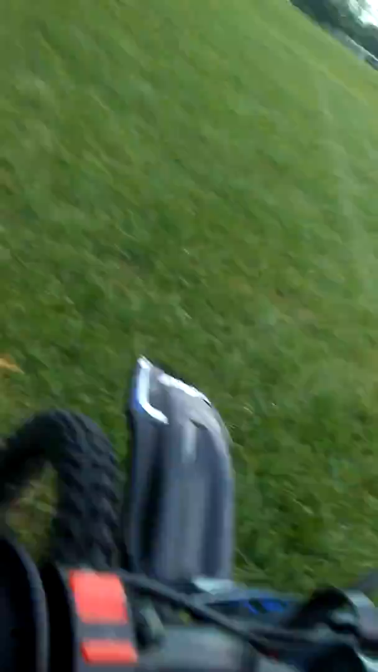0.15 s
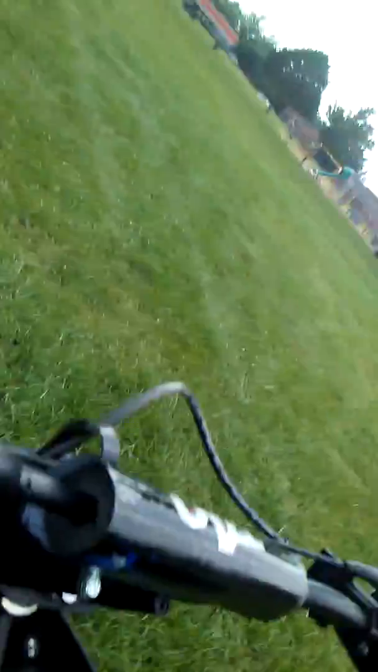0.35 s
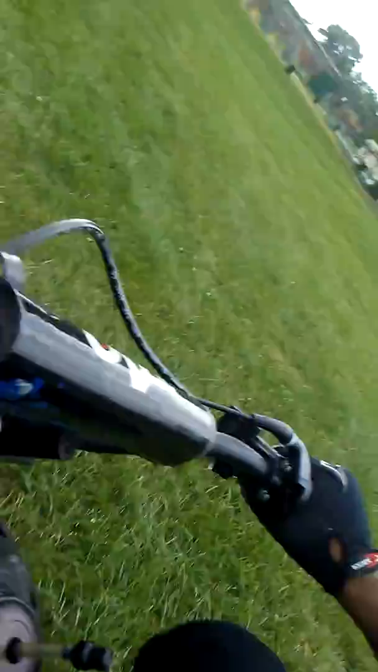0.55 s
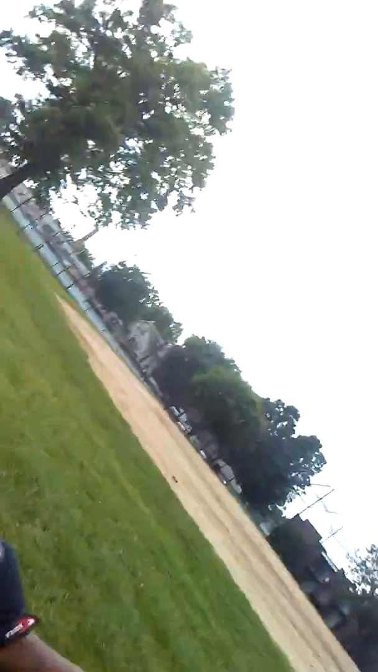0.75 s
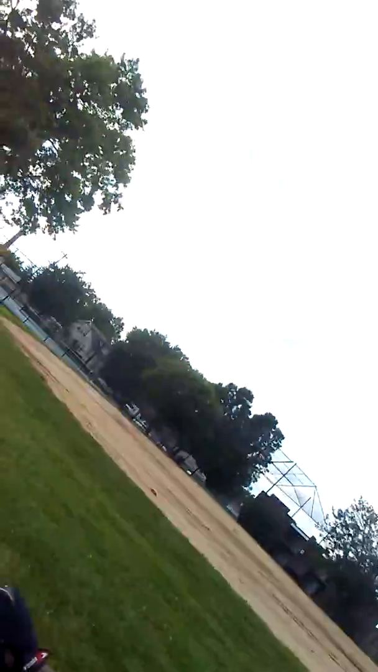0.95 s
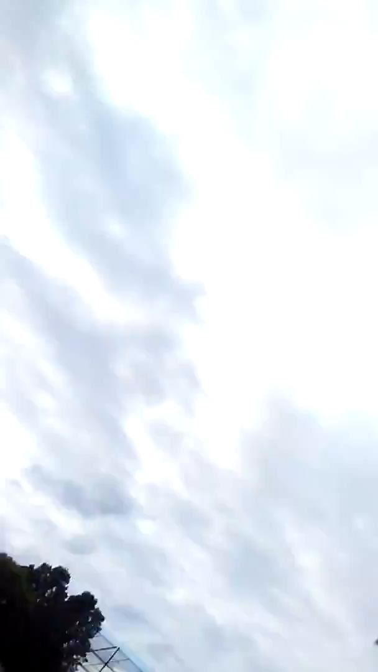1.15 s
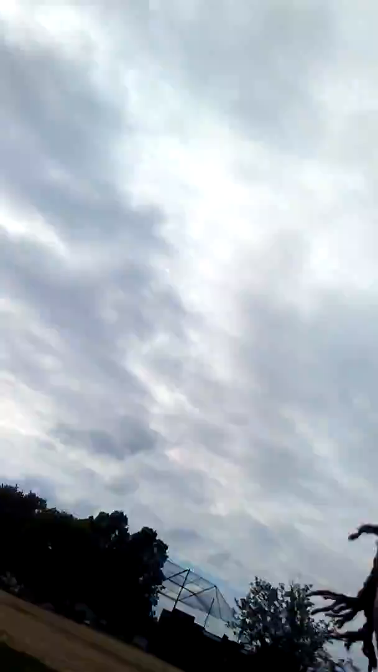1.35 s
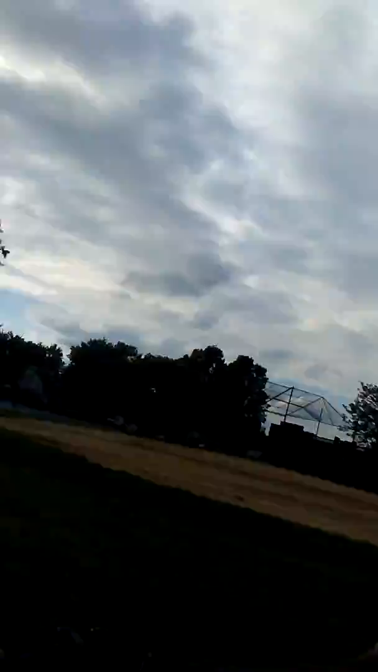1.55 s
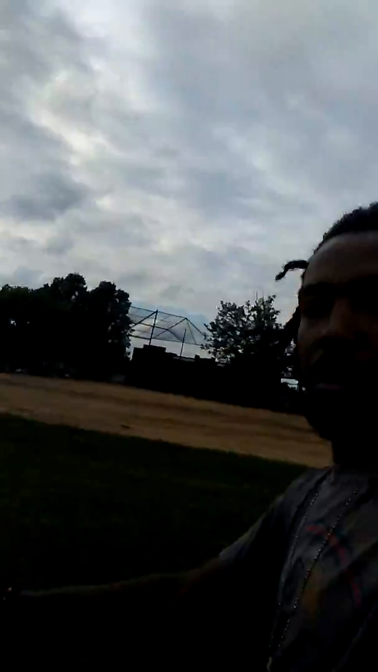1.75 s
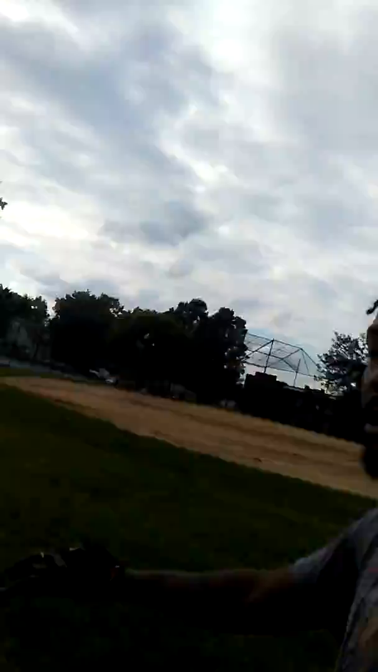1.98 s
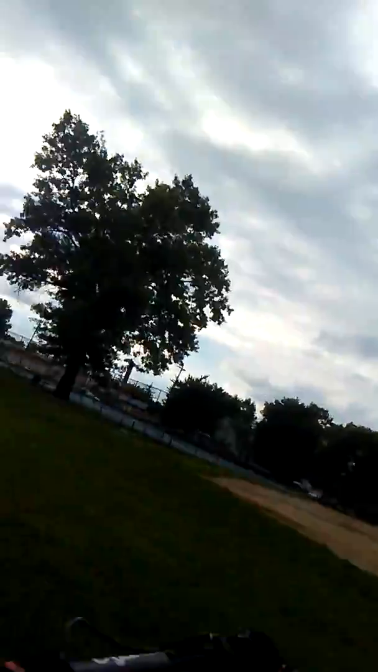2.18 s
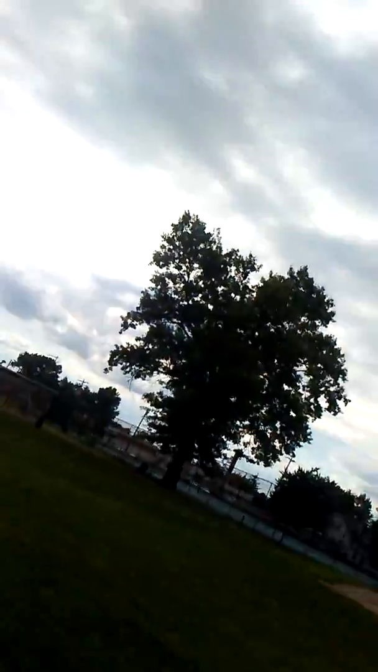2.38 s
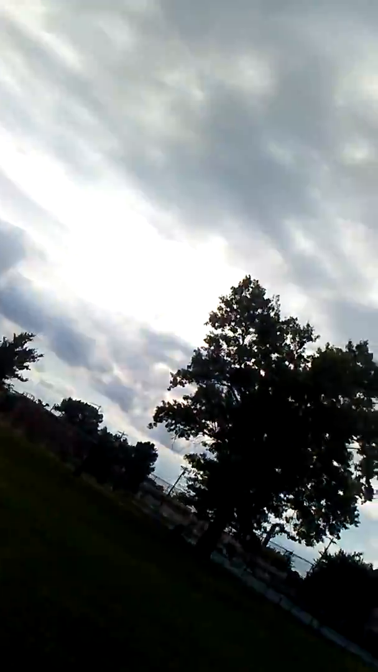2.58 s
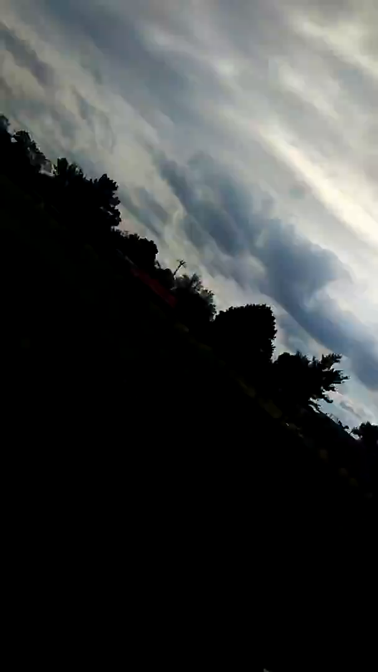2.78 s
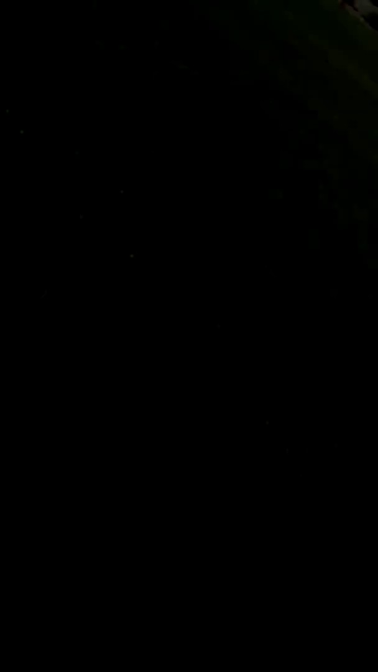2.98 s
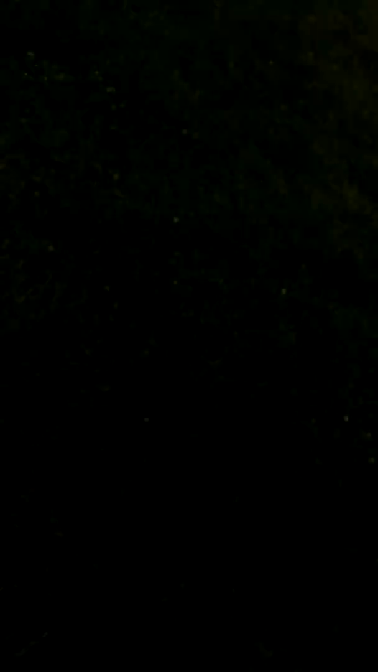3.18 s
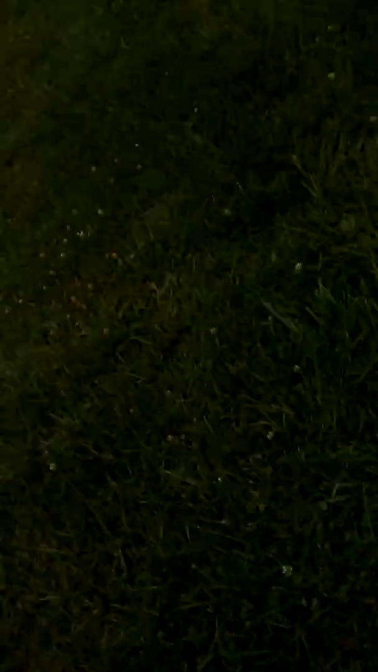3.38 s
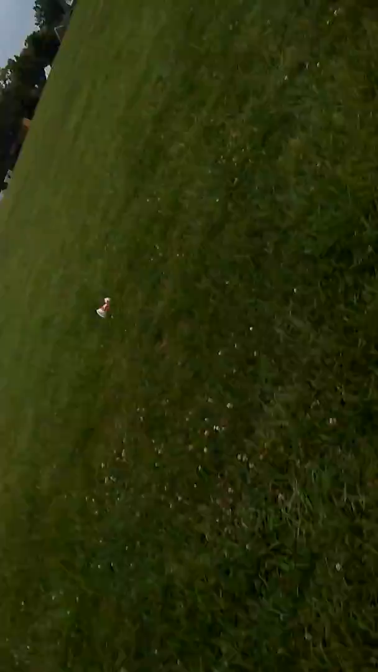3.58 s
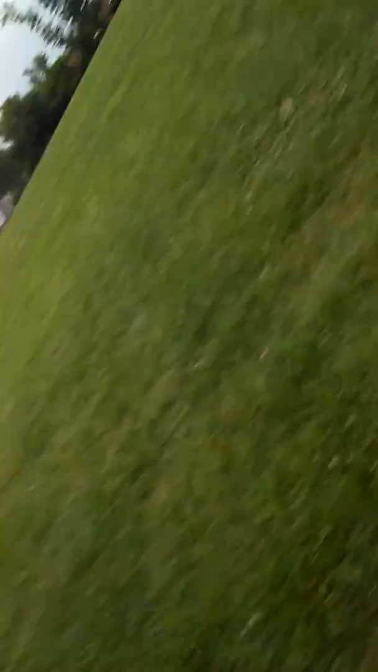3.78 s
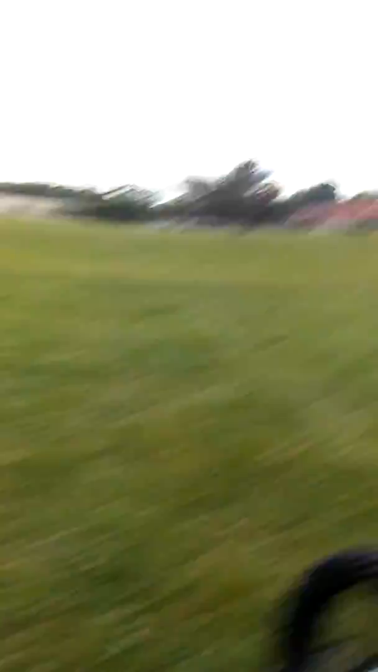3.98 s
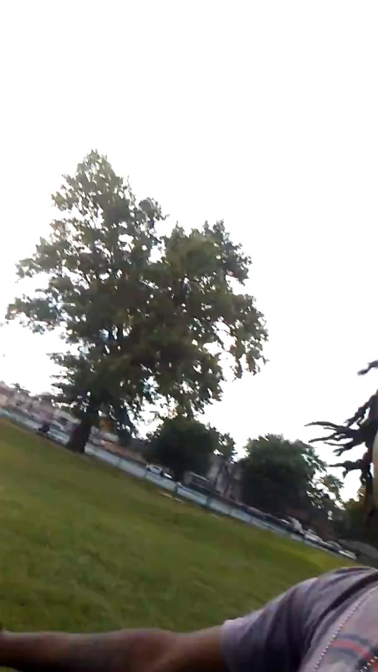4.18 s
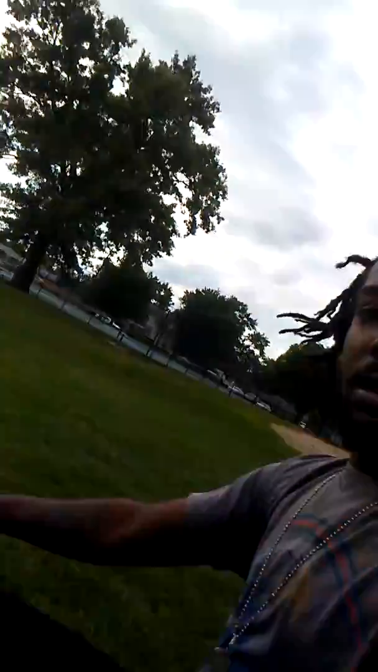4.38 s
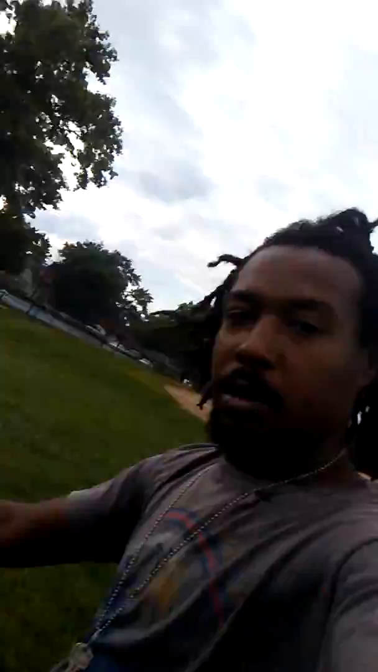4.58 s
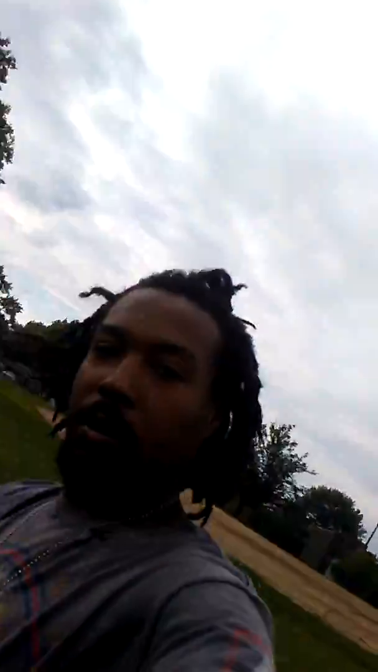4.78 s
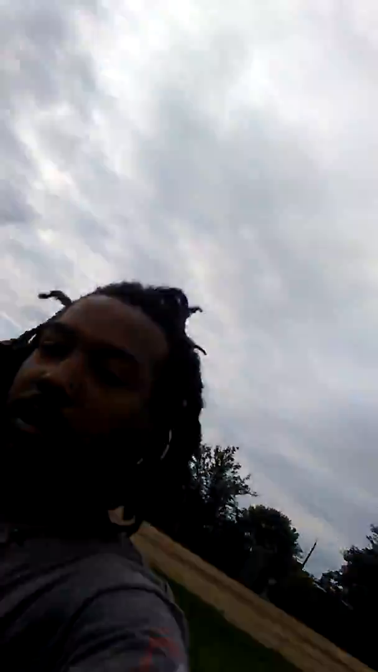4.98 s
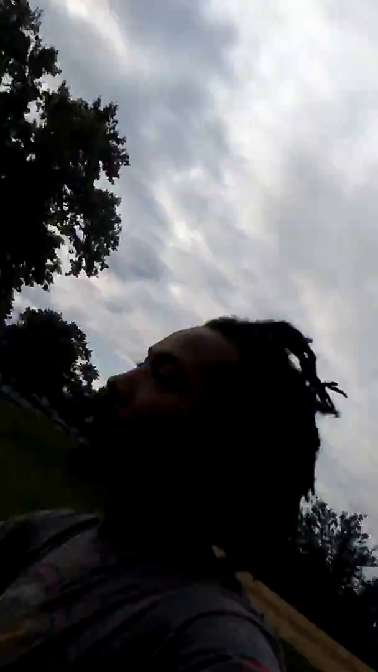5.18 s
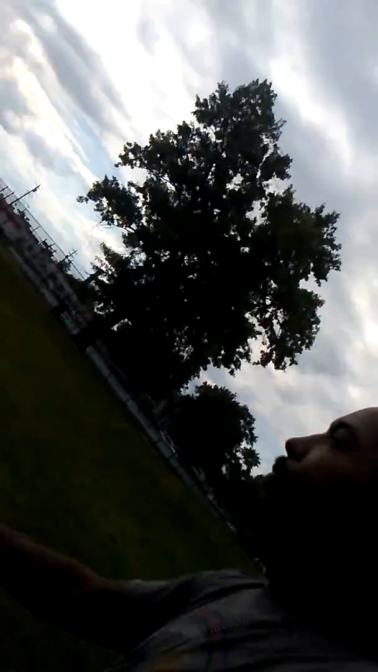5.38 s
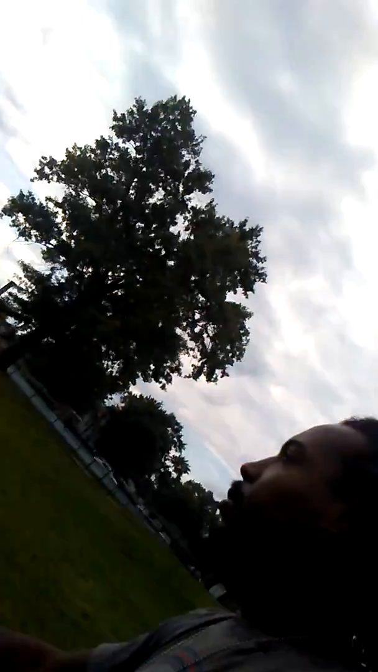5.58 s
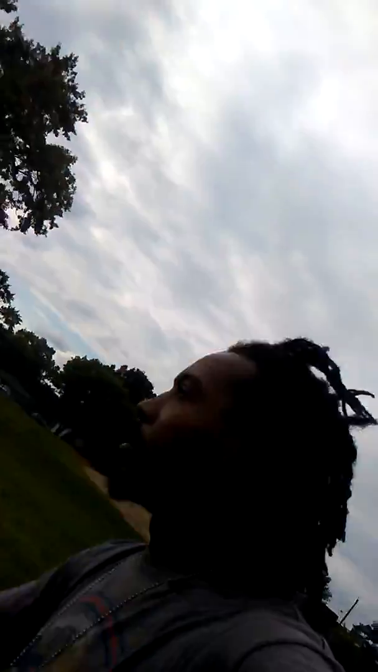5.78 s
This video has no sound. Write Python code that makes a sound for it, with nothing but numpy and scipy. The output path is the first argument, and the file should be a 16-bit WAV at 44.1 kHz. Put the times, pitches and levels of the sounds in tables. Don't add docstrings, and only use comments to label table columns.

```python
import sys
import numpy as np
from scipy import signal
from scipy.fft import rfft, irfft, next_fast_len
from scipy.io import wavfile
from scipy.ndimage import uniform_filter1d

SR = 44100
rng = np.random.default_rng(int(sys.argv[2]) if len(sys.argv) > 2 else 0)


def makeup_ratio(level_db):
    decades = np.asarray(level_db, float) / 20
    return 10 ** decades


def put_to_file(sound):
    columns = np.atleast_2d(sound).T
    safe = np.clip(columns, -1, 1)
    whole_steps = np.round(safe * 32767)
    wavfile.write(sys.argv[1], SR, whole_steps.astype(np.int16))


N = 257588
START_S = .5278

# time in seconds, firings per second.
SPEED = [(0.52, 19.8), (0.97, 18.98), (1.09, 19.39), (1.68, 19.55), (1.98, 18.59), (2.54, 19.42),
         (2.6, 19.22), (3.11, 20.82), (3.34, 21.0), (3.62, 23.88), (4.1, 26.2), (4.28, 24.52),
         (4.61, 26.66), (4.84, 27.9), (5.19, 27.88), (5.29, 26.48), (5.64, 25.23), (5.84, 27.24)]
# time in seconds, view of the intake 0-1, view of the cooling fins 0-1,
# hand cupped over the microphone 0-1.
SWING = [(.55, 0.1, 0.1, 0), (.9, .2, 0.38, .2), (1.2, 0.45, 0.84, 0.38), (1.4, 0.87, 0.66, 0.08),
         (1.75, .2, .8, 0.1), (2.2, 0.5, 0.62, 0.63), (2.53, 0.3, 0.73, 0.93), (2.86, 0.62, 0.76, 0.42),
         (3.05, 0.73, 0.76, 0.95), (3.36, 0.91, 0.76, 0.48), (3.62, 0.88, 0.87, 0.01), (3.92, 0.65, 0.9, 0),
         (4.18, 0.88, 0.96, 1), (4.35, 0.74, 0.85, 0.28), (4.68, 0.97, 1, 0.27), (5.0, 0.9, 0.85, 0.52),
         (5.34, 0.71, 0.64, 0.24), (5.84, 0.57, 0.73, 0.43)]


def exhaust(turns):
    # frequency in Hz, level in dB, decay by 60 dB in seconds, rise in seconds.
    boom_long = [(115.98, 9.5, 0.26, 0.00051), (219, -31.5, 0.54, 0.028), (93, -6.5, 0.2, 0.0023)]
    boom_short = [(111.6, 11.5, 0.11, 0.015), (240, 8, 0.032, 0.0009), (83, -7, 0.073, 0.012)]
    boom_loaded = [(120.3, 3, 0.18, 0.0049), (148, -9, 0.02, 0.011), (243.5, 0.5, 0.041, 0.0072),
                   (47.7, -7.5, 0.064, 0.0042), (202, 4, 0.037, 0.0028)]
    bark_idle = [(343.9, 1, 0.057, 0.0082), (295, -6, 0.044, 0.0036), (419, -8, 0.057, 0.007),
                 (224, -7, 0.021, .001)]
    bark_loaded = [(370.5, 2, 0.067, 0.008), (299, 0.5, 0.031, 0.0005), (432.5, -5.5, 0.14, 0.011),
                   (205, 6.5, 0.015, 0.00032), (454, -3.5, 0.042, 0.0026)]
    rasp_idle = [(557, 2.5, 0.037, 0.0039), (649, 5, 0.048, 0.0047), (710, 2, 0.045, 0.0046),
                 (823, 4, 0.025, 0.0042), (864, -6, 0.029, 0.0069)]
    rasp_loaded = [(726.6, 2, 0.12, 0.0013), (848, 16.5, 0.018, 0.0009), (590, -47, 0.065, 0.0078),
                   (1060, -21, 0.038, 0.0024)]
    load, hidden, near_db, aim = throttle()

    boom_db = -8 + near_db - 14.5 * hidden
    bark_db = -10 + .2 * near_db - 9.5 * aim
    rasp_db = -34.5 + 14.5 * aim

    advance = .02 * load + .004 * np.maximum(curves(SPEED)[0] - 21, 0)
    fired = np.floor(turns + advance + .005 * drift(1500))
    blows = (np.diff(fired, prepend=fired[0]) > 0) * makeup_ratio(.21 * rng.standard_normal(N))
    blows = signal.lfilter(np.hanning(45), 1, blows)

    lag = 48
    long_boom = ring(np.roll(blows, 2 * lag), boom_long)
    short_boom = ring(np.roll(blows, lag), boom_short)
    boom = blend(load, blend(hidden, long_boom, short_boom), ring(blows, boom_loaded))
    bark = blend(load, ring(blows, bark_idle, against=2), ring(blows, bark_loaded, against=2))
    turned = np.minimum(1.48 * load, 1)
    rasp = blend(turned, ring(blows, rasp_idle, against=3), ring(blows, rasp_loaded, against=0))
    rasp = rasp * (1 + .45 * (1 - aim) * drift(120))
    return makeup_ratio(boom_db + 6.5) * boom - makeup_ratio(bark_db + 5) * bark - makeup_ratio(rasp_db + 3.5) * rasp


def crank():
    running = np.arange(N) >= START_S * SR - 3 * SR // 10
    turns = np.cumsum(curves(SPEED)[0] * running) / SR
    first_turn = .197
    return turns - turns[round(START_S * SR)] + first_turn - 1


def throttle():
    # time in seconds, load 0-1, pipe mouth hidden by the rider 0-1, nearness of the pipe in dB,
    # microphone aimed at the pipe 0-1.
    riding = [(.5, 0.14, 0.17, -4, 0.65), (.9, 0.25, 0.26, -1, 0.77), (1.4, 0.17, 0.24, -1.5, 0.64),
              (1.87, 0.15, 0.97, 3.5, 0.67), (2.3, 0.17, 0.76, 1, 0.63), (2.8, 0.32, 0.47, 2, 0.59),
              (3.19, .29, 0.23, 4.5, 0.44), (3.52, .4, 0.17, -0.5, 0.84), (3.85, .48, 0.15, 2, 0.82),
              (4.2, 0.47, 0.18, 1, 0.36), (4.8, 0.69, 0.13, -2.5, 0.24), (5.2, 0.79, 0.24, -2, 0.16),
              (5.5, 0.59, 0.54, 2.5, 0.36), (5.84, 0.79, 0.3, -3, 0.47)]
    load, hidden, near_db, aim = curves(riding)
    return np.clip(load, 0, 1), np.clip(hidden, 0, 1), near_db, aim


def intake_hiss(turns):
    # frequency in Hz, bandwidth in Hz, level in dB.
    intake_modes = [(5440, 1630, 2.5), (6940, 3000, -7.5)]
    upper_modes = [(8780, 2670, 17), (10900, 1800, 7)]
    intake, fins, cup = curves(SWING)
    hidden = throttle()[1]
    intake_db, upper_db = -51 + 35 * intake, -61 + 38.5 * fins
    intake_shift_hz = 694 - 800 * intake + 101.7 * cup
    upper_shift_hz = 300 - 1700 * cup
    lower = makeup_ratio(intake_db - 4.6) * shifted(resonant_noise(intake_modes), intake_shift_hz)
    upper = makeup_ratio(upper_db - .87) * shifted(resonant_noise(upper_modes), upper_shift_hz)
    hiss = signal.lfilter(*signal.butter(4, 4700, "high", fs=SR), lower + upper)

    depth = np.minimum(.22 * (curves(SPEED)[0] - 18), .75) * (1 - 1.93 * hidden)
    depth = np.clip(depth, 0, 1)
    phase = turns % 1
    valve = .29 * np.exp(-((phase - .65) / .34) ** 6) + 1.95 * np.exp(-((phase - .48) / .15) ** 4)
    return (1 - depth + depth * valve) * hiss


def valve_clatter():
    # frequency in Hz, bandwidth in Hz, level in dB.
    case_modes = [(1503, 68, 2), (1767, 130, 0.5), (2900, 740, 7.5)]
    # time in seconds, level in dB, half length in seconds.
    clatter = [(.55, -32, 0.073), (.88, -45, 0.085), (1.43, -27.5, 0.37), (1.95, -32, 0.26),
               (2.45, -29, 0.35), (2.98, -29.5, 0.25), (3.36, -33, 0.062), (3.75, -33, 0.084),
               (4.25, -34, 0.053), (4.51, -40, .1), (5.01, -30, 0.14), (5.4, -28, 0.15), (5.67, -41, 0.08)]
    return makeup_ratio(-3.5) * spells(clatter) * resonant_noise(case_modes)


def engine_wash():
    # frequency in Hz, level in dB.
    wash_spectrum = [(40, -22.5), (150, 5.5), (600, -7), (1000, -11), (1500, -9.5), (2200, -13),
                     (3800, -18.5), (6500, -18.5), (10200, -35.5), (12000, -23), (13500, -33.5),
                     (15500, -35)]
    load, hidden, _, _ = throttle()
    wash_db = -29 + 2 * curves(SWING)[0] - 8.5 * hidden + 8 * load
    return makeup_ratio(wash_db + 3 + 2 * drift(400)) * coloured(gritty(900, 3, .3), wash_spectrum)


def knocks():
    # start in seconds, peak in dB, ring in Hz, ring length in seconds.
    hits = [(0.536, -4, 3900, 0.0012), (0.5526, -0.5, 3740, 0.0036), (0.582, -9.5, 3940, 0.0017),
            (1.327, -5.5, 6600, 0.0009), (1.353, 14.5, 4140, 0.001), (2.49, -18, 4160, .002),
            (3.06, 4.5, 4120, 0.0045), (3.287, -22, 5230, 0.0024), (3.65, -24, 2980, 0.0027),
            (5.461, -6, 2810, 0.0039), (5.526, -12, 2860, 0.0025), (5.543, -4, 2480, 0.0057),
            (5.587, -4, 3580, 0.0081), (5.809, -2, 2900, 0.0011)]
    # time in seconds, level in dB, length in seconds.
    scrapes = [
        (0.924, -26.5, 0.04),
        (1.036, -28.5, 0.019),
        (1.337, -23.5, 0.0092),
        (1.548, -27.5, 0.044),
        (3.086, -27, 0.1),
        (5.708, -22, 0.0046),
        (5.777, -20.5, 0.013),
        (5.818, -25, 0.022),
    ]
    out, t = np.zeros(N), np.arange(3000) / SR
    grains = rng.standard_normal((len(hits) + len(scrapes), len(t)))
    grains = signal.lfilter(*signal.butter(2, [1400, 6500], "band", fs=SR), grains)
    for (s, db, hz, length), grain in zip(hits, grains):
        partials = ((.6, 1), (1.2, .7), (1.9, .3))
        tick = sum(share * np.sin(2 * np.pi * ratio * hz * t) for ratio, share in partials)
        tick = .45 * tick + 2.2 * grain + .25 * np.diff(grain, 2, prepend=[0, 0])
        onset = np.sin(np.minimum(t / .0003, np.pi / 2)) ** 2
        tick = tick * np.exp(-t / .0006) * onset
        tail = .2 * np.sin(2 * np.pi * hz * t) * np.exp(-t / length)
        add(out, s, makeup_ratio(db) * (tick + tail))
    middle = 1500 / SR
    for (s, db, length), grain in zip(scrapes, grains[len(hits):]):
        swell = np.exp(-((t - middle) / (length / 2)) ** 2)
        add(out, s - middle, makeup_ratio(db) * 2 * grain * swell)
    return out


def wind():
    # frequency in Hz, level in dB.
    thump_spectrum = [(20, -28), (55, -1.5), (100, -3), (200, -13.5), (600, -54), (3000, -75), (12000, -86)]
    flutter_spectrum = [(60, -87), (150, -5), (300, -9.5), (450, -3), (700, -22), (1200, -27), (3000, -66),
                        (12000, -85)]
    # time in seconds, thump in dB, half length in seconds, flutter in dB.
    gusts = [(1.1, -25, 0.26, -38), (2.1, -29, 0.75, -64), (4.3, -23, 0.051, -18), (4.5, -14, 0.044, -30),
             (4.75, -29, 0.13, -35), (5.13, -18, 0.061, -28), (5.39, -10.5, 0.053, -9),
             (5.47, -22, 0.02, -8.5), (5.54, -5, 0.051, -18), (5.66, -16, 0.029, -5.5),
             (5.84, -9, 0.099, -10.5)]
    thumps = makeup_ratio(-33) + spells(gusts)
    flutters = makeup_ratio(-36) + spells(gusts, column=3)
    thump = thumps * makeup_ratio(2.4 * drift(900)) * coloured(rng.standard_normal(N), thump_spectrum)
    flutter = flutters * makeup_ratio(3 * drift(400)) * coloured(rng.standard_normal(N), flutter_spectrum)
    return thump + flutter


def ring(blows, modes, against=None):
    t, response = np.arange(SR // 2) / SR, 0
    for k, (hz, db, t60, rise) in enumerate(modes):
        swing = -makeup_ratio(db) if k == against else makeup_ratio(db)
        envelope = makeup_ratio(-60 * t / t60) * (1 - np.exp(-t / max(rise, 1e-4)))
        response = response + swing * envelope * np.sin(2 * np.pi * hz * t)
    return evened(signal.oaconvolve(blows, response)[:N])


def resonate(x, hz, width):
    r = np.exp(-np.pi * width / SR)
    return signal.lfilter([1 - r], [1, -r * np.exp(2j * np.pi * hz / SR)], x).real


def resonant_noise(modes):
    total = 0
    for hz, width, db in modes:
        once = resonate(gritty(1500, 3, .5), hz, width)
        total = total + makeup_ratio(db + 2.5 * drift(200)) * evened(resonate(once, hz, width))
    return evened(total)


def gritty(per_s, spread_db, share):
    sizes = rng.standard_normal(N) * makeup_ratio(spread_db * np.minimum(rng.exponential(1, N), 4))
    clicks = sizes * (rng.random(N) < per_s / SR)
    return rng.standard_normal(N) + share * evened(clicks)


def coloured(x, spectrum):
    f, db = np.transpose(spectrum)
    hz = np.fft.rfftfreq(N, 1 / SR)
    gain_db = np.interp(np.log(hz + 1), np.log(f + 1), db)
    return evened(irfft(rfft(x) * makeup_ratio(gain_db), N))


def shifted(x, hz):
    analytic = signal.hilbert(x, next_fast_len(N))[:N]
    return (analytic * np.exp(2j * np.pi * np.cumsum(hz) / SR)).real


def drift(samples):
    slow = uniform_filter1d(rng.standard_normal(N), int(samples))
    return evened(uniform_filter1d(slow, int(samples)))


def spells(rows, column=1):
    t = np.arange(0, N / SR + .01, .002)
    power = sum(makeup_ratio(2 * row[column]) * np.exp(-2 * ((t - row[0]) / row[2]) ** 2) for row in rows)
    return np.interp(np.arange(N) / SR, t, np.sqrt(power))


def curves(table):
    s, *columns = np.transpose(table)
    return [np.interp(np.arange(N) / SR, s, c) for c in columns]


def blend(share, a, b):
    return (1 - share) * a + share * b


def evened(x):
    return x / np.sqrt(np.mean(x ** 2) + 1e-20)


def add(mix, s, sound):
    part = mix[round(s * SR):][:len(sound)]
    part += sound[:len(part)]


def scene():
    turns = crank()
    mix = exhaust(turns) + intake_hiss(turns) + valve_clatter() + engine_wash() + knocks() + wind()
    return signal.lfilter(*signal.butter(1, 25, "high", fs=SR), mix)[None]


def roll_off(x):
    return signal.sosfilt(signal.butter(12, 16870, fs=SR, output="sos"), x)


def record(dry):
    # time in seconds, level in dB.
    crest_tones = [
        (.5, -13),
        (1.3, -28),
        (1.7, -10),
        (3.1, -27.5),
        (5.84, -65),
    ]
    peak_db = 20 * np.log10(abs(dry[0]) + 1e-6)
    fall = np.arange(N) * 1100.0 / SR
    held_peak_db = np.maximum.accumulate(peak_db + fall) - fall
    over_db = np.maximum(held_peak_db + 7.5, 0)
    limited = dry[0] / makeup_ratio(.52 * uniform_filter1d(over_db, size=61))
    held = .93 * np.tanh(1.217 * limited)

    crest = np.maximum(abs(uniform_filter1d(held, size=21)) - .45, 0)
    t = np.arange(N) / SR
    tones = np.sin(2 * np.pi * 6050 * t) + .9 * np.sin(2 * np.pi * 12000 * t)
    buzz = makeup_ratio(curves(crest_tones)[0]) * crest * tones
    x = held - held.mean() + buzz - .0075
    x = signal.oaconvolve(x, signal.firwin(511, 15800, fs=SR), "same")
    mix = (x * (t >= START_S))[None]
    return roll_off(mix)


dry = scene()
out = record(dry)
put_to_file(out)
```